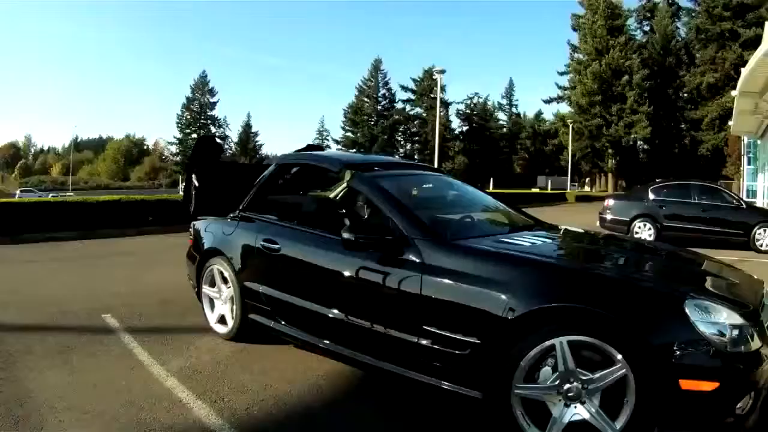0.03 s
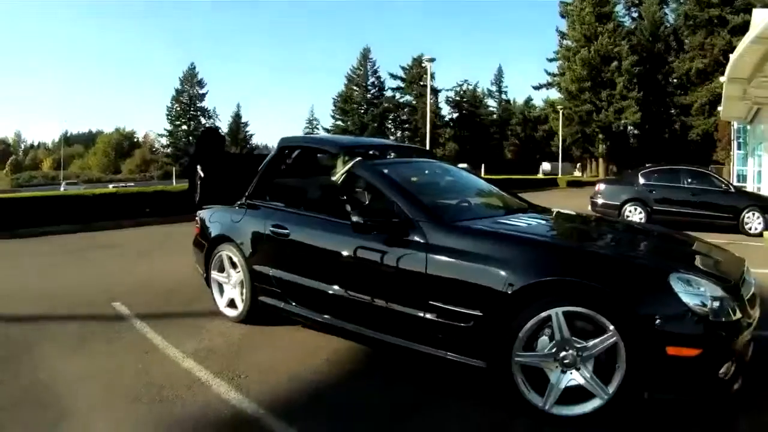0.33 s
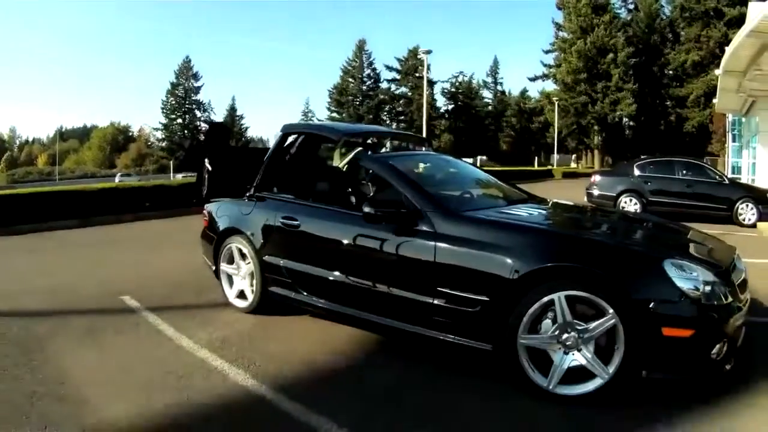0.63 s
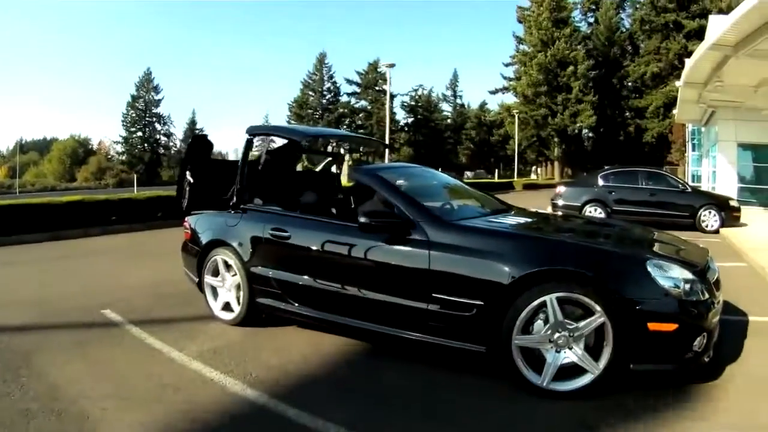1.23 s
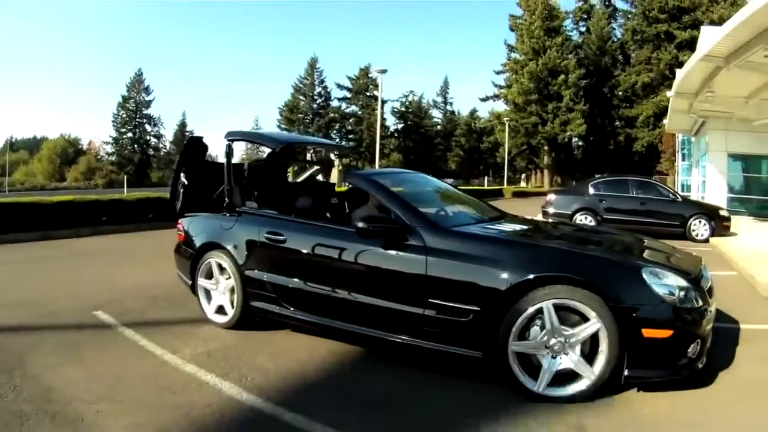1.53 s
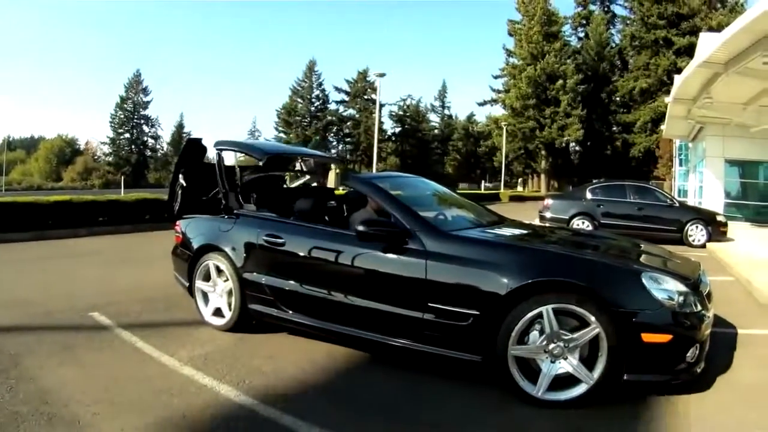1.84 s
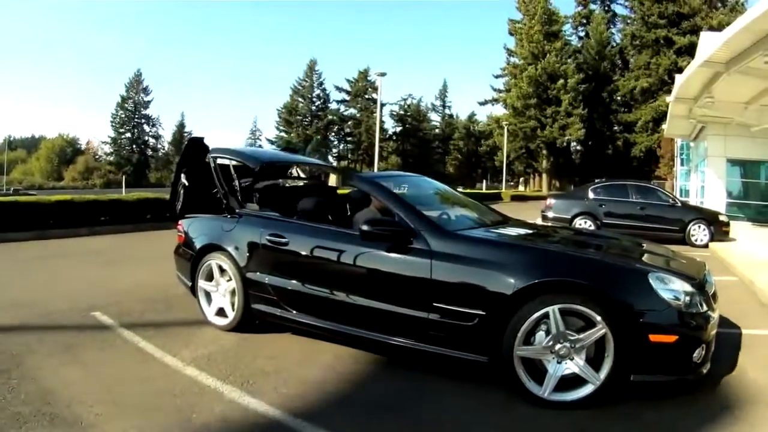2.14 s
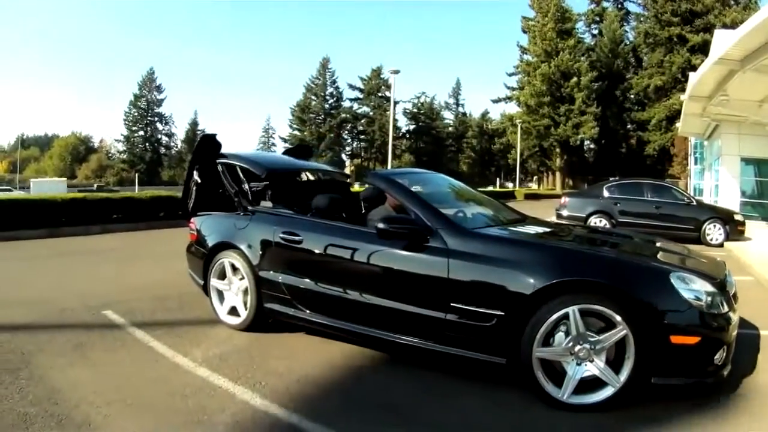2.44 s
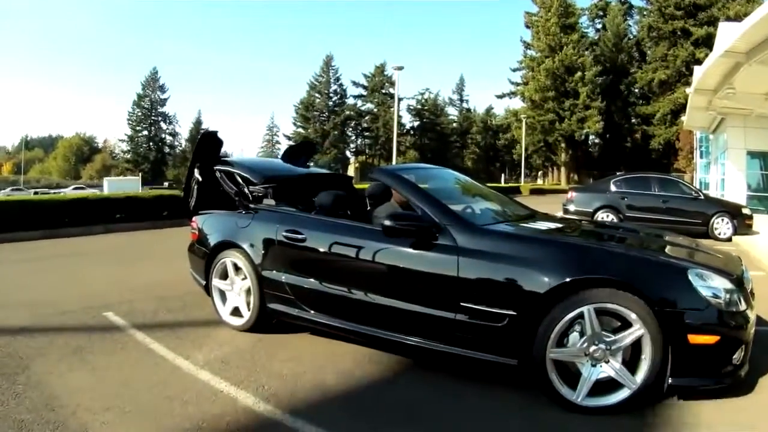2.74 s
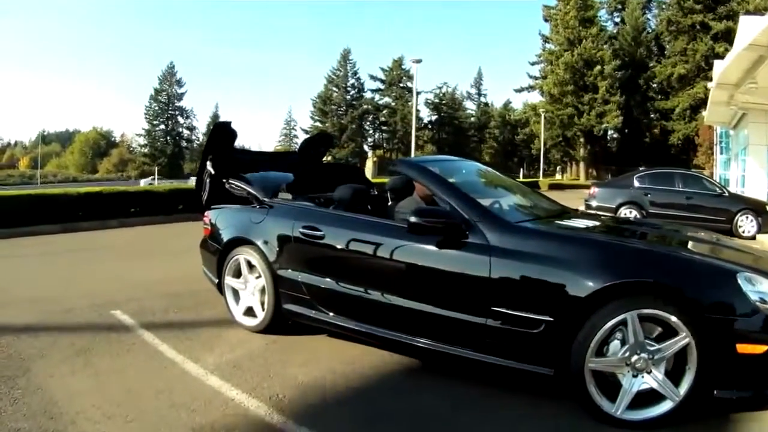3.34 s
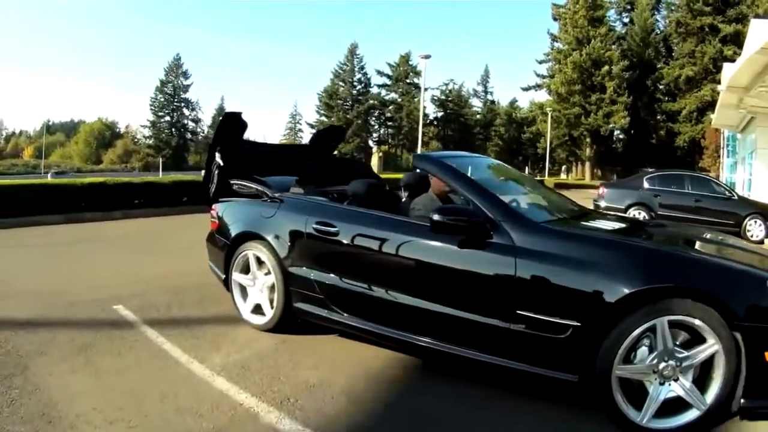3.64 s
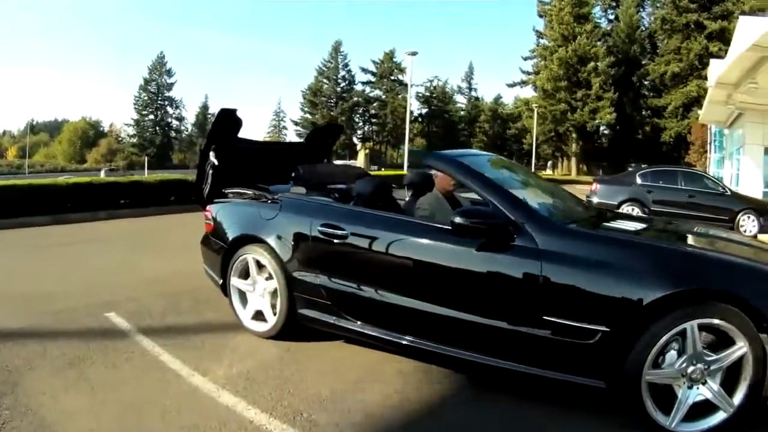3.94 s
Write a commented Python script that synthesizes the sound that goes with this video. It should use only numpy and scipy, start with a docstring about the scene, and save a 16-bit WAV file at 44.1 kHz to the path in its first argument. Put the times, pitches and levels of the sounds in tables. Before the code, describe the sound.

After a brief silence, an idling eight-cylinder car cuts in at about 0.2 seconds, rumbling in an open parking lot. Its speed sags slowly, and the exhaust drone gives way to a lower hum from around 2 seconds. Distant highway tyres roar steadily throughout. Light wind flutters on the microphone, thumping around 1.7 seconds and faintly near 2.9. A slight sizzle follows the sound until the end, near 4 seconds.

```python
"""After a moment of silence, an eight-cylinder car cuts in, idling in an open parking lot.
Its speed sags slowly; the exhaust's drone fades while a lower hum takes over, both multiples of
the crank rate. Tyres roar on a distant highway and light wind thumps on the microphone.
The small camera's low sample rate adds a sizzle that follows the sound."""
import sys
import numpy as np
from scipy import signal
from scipy.fft import rfft, irfft, next_fast_len
from scipy.io import wavfile
from scipy.ndimage import uniform_filter1d, map_coordinates

SR = 44100
rng = np.random.default_rng(int(sys.argv[2]) if len(sys.argv) > 2 else 0)


def file_out(sig):
    """Save sig as 16-bit WAV at sys.argv[1]."""
    # one column per channel
    cols = np.atleast_2d(sig).T
    # limit, then scale
    lim = np.clip(cols, -1, 1)
    pcm = np.round(lim * 32767).astype(np.int16)
    wavfile.write(sys.argv[1], SR, pcm)


N = 176400


def amp(db):
    """Decibels to gain."""
    return 10 ** (np.asarray(db) / 20)


def unit(x):
    """Scale to rms 1."""
    return x / np.sqrt(np.mean(x ** 2) + 1e-20)


def clock():
    """Time of each sample in seconds."""
    return np.arange(N) / SR


def curve(rows):
    """Points joined by straight lines. Each row: time in seconds, value."""
    return np.interp(clock(), *np.transpose(rows))


def wobble(knots_per_s):
    """A smooth random curve around zero."""
    return map_coordinates(rng.standard_normal(4096), [clock() * knots_per_s], mode="wrap")


def filtered(x, response):
    """Filter x by response, a gain as a function of frequency in Hz."""
    size = next_fast_len(N + 8192)
    hz = np.fft.rfftfreq(size, 1 / SR)
    return irfft(rfft(x, size) * response(hz), size)[:N]


def noise(spectrum):
    """Coloured noise of rms 1. Each row: frequency in Hz, relative level in dB."""
    knots_hz, db = np.transpose(spectrum)
    white = rng.standard_normal(N)
    return unit(filtered(white, lambda hz: amp(np.interp(np.log(hz + 1), np.log(knots_hz), db))))


def patchy(x, depth_db):
    """Lay random patches of gain over time and frequency; the result has rms 1."""
    spectra = signal.stft(x, nperseg=1024)[2]
    patches = uniform_filter1d(rng.standard_normal(spectra.shape), size=5, axis=0)
    patches = unit(uniform_filter1d(patches, size=12, axis=1))
    return unit(signal.istft(spectra * amp(depth_db * patches))[1][:N])


def highway():
    """Far from the lot, the tyres of many cars merge into one nearly steady roar."""
    # Each row: time in seconds, level in dB.
    level = [(.23, -27), (.6, -27.5), (1.2, -28), (1.7, -28.5), (2.4, -27.5), (3, -28), (3.4, -29),
             (4, -28.5)]
    # Each row: frequency in Hz, relative level in dB.
    tyre_spectrum = [(60, -21.5), (300, -5.5), (420, -4), (520, -1), (630, -2.5), (780, -.5), (1040, 0),
                     (1230, -4), (1450, -5), (1620, -7), (1770, -7.5), (1950, -10.5), (2400, -13.5),
                     (2850, -15), (3600, -20), (4700, -22.5), (6000, -27.5)]
    return amp(curve(level) + 0.21 * wobble(9)) * patchy(noise(tyre_spectrum), depth_db=0.69)


def wind():
    """A breeze flutters right on the microphone; each strong eddy gives it one short, low shove."""
    # Each row: time in seconds, level in dB.
    breeze_level = [(.23, -29), (1.35, -42), (1.65, -30), (2.15, -31), (2.55, -37), (2.9, -28), (3.2, -36),
                    (3.6, -30.5), (4, -34)]
    # Each row: frequency in Hz, relative level in dB.
    buffet_spectrum = [(8, -36), (20, -14), (42, -2), (65, -5.5), (115, -9), (200, -26), (500, -51)]
    # Each row: centre in seconds, envelope peak in dB, pitch in Hz, half length in seconds.
    thumps = [(1.681, -4, 69.7, 0.008), (1.779, -11.5, 109, 0.0087), (1.839, -10, 72, 0.011),
              (2.876, -18, 38, .028)]
    flutter = amp(2.7 * wobble(14))
    buffeting = amp(curve(breeze_level)) * unit(flutter * noise(buffet_spectrum))
    for centre_s, db, hz, half_s in thumps:
        t = clock() - centre_s
        buffeting += amp(db) * np.exp(-(t / half_s) ** 2) * np.sin(2 * np.pi * hz * t)
    return buffeting


def hum_rush(width_hz=20.3):
    """A narrow band of exhaust noise around the hum, sinking in pitch."""
    # Each row: time in seconds, centre of the band in Hz.
    centre = [(.23, 255.5), (2.2, 237), (3.2, 228), (3.8, 195)]
    # Each row: time in seconds, level in dB.
    level = [(.23, -34), (1.5, -43.5), (2.3, -38.5), (3.3, -42), (3.8, -34)]
    slow_noise = filtered(rng.standard_normal(N), lambda hz: 1 / (1 + (hz / width_hz) ** 2) ** 2)
    carrier = np.sin(2 * np.pi * np.cumsum(curve(centre)) / SR)
    return amp(curve(level)) * unit(slow_noise * carrier)


def crank_tone(turns, order, waver_db, drift_rad):
    """One multiple of the crank rate, unsteady in level and phase, at rms 1."""
    phase = 2 * np.pi * (order * turns + rng.random()) + drift_rad * wobble(7)
    return unit(np.sin(phase) * amp(waver_db * wobble(8)))


def engine():
    """The car idling in the lot: crank tones over an exhaust rumble that puffs at each firing."""
    # Each row: time in seconds, firing rate in Hz.
    firing_rate = [(.25, 78.75), (.7, 78.55), (1.2, 77.56), (2.2, 77.14), (2.7, 76.47), (3.1, 75.47),
                   (3.5, 74.25), (4, 74)]
    # Each row: time in seconds, level in dB.
    boom_level = [(.23, -21.5), (.4, -18.5), (.5, -24), (.6, -19), (.82, -31), (1.25, -29), (1.6, -33.5),
                  (2.1, -25.5), (2.4, -27.5), (2.85, -33.5), (3.02, -21.5), (3.22, -43), (3.4, -19.5),
                  (3.58, -46), (3.78, -31), (4, -43)]  # the firing note
    hum_level = [(.23, -44), (1.9, -41), (2.2, -36.5), (2.75, -33), (3.2, -38.5), (3.45, -36), (4, -42)]  # near 230 Hz
    drone_level = [(.23, -27), (.85, -29), (1.2, -33), (1.6, -38), (2, -34.5), (2.3, -44), (3.2, -42),
                   (4, -59)]  # near 300 Hz
    # Each row: multiple of the crank rate, level in dB (for the drone, relative to drone_level).
    body_orders = [(2, -37.5), (3, -40), (5, -37), (6, -33.5), (7, -40.5), (8, -43), (9, -44.5), (10, -42),
                   (11, -47.5), (13, -43.5)]
    drone_orders = [(8, -8.5), (9, -9.5), (14, -14), (15, -4), (16, -2.5), (18, -15.5), (30, -14.5)]
    # Exhaust noise. Each row: frequency in Hz, relative level in dB.
    rush_spectrum = [(100, -58), (240, -6), (290, 5), (315, -3.5), (335, 7), (355, -8), (390, -49),
                     (700, -60)]
    rumble_spectrum = [(8, -45), (22, -16), (45, -1.5), (80, 2), (122, -1), (170, -2.5), (250, -11.5),
                       (310, -19.5), (420, -28), (900, -62)]

    firings = np.cumsum(curve(firing_rate) * (1 + 0.0039 * wobble(6.04))) / SR
    turns = firings / 4  # eight cylinders fire four times a turn
    boom = amp(curve(boom_level)) * crank_tone(turns, order=4, waver_db=0.7, drift_rad=0.33)
    hum = amp(curve(hum_level)) * crank_tone(turns, order=12, waver_db=2.5, drift_rad=0.38)
    body = sum(amp(db) * crank_tone(turns, order, waver_db=5.5, drift_rad=0.61)
               for order, db in body_orders)
    drone_tones = sum(amp(db) * crank_tone(turns, order, waver_db=3.0, drift_rad=0.47)
                      for order, db in drone_orders)
    drone = amp(curve(drone_level)) * (drone_tones + amp(-4.5) * noise(rush_spectrum))
    puffs = 1 + 0.33 * np.cos(2 * np.pi * firings)
    rumble = amp(-28) * unit(puffs * noise(rumble_spectrum))
    return boom + hum + body + drone + rumble


def scene():
    """The car, the distant highway and the wind, all at one microphone in the open lot."""
    return (engine() + hum_rush() + highway() + wind())[None]


def record(dry):
    """The camera cuts in, dulls the treble and holds each slow sample, mirroring the sound as sizzle."""
    start_s, hold_hz = 0.229, 12000
    roll_off_hz, steepness = 5657, 23.3
    top_hz, edge_hz = 15380, 200
    dulled = filtered(dry[0], lambda hz: 1 / (1 + (hz / roll_off_hz) ** steepness))
    mirrored = dulled * (1 + 2 * np.cos(2 * np.pi * hold_hz * clock()))  # images either side of hold_hz
    held = filtered(mirrored, lambda hz: np.sinc(hz / hold_hz))
    gated = held * (clock() > start_s)
    # The sizzle stops at top_hz, behind a short, smooth edge.
    return filtered(gated, lambda hz: np.sin(np.pi / 2 * np.clip((top_hz - hz) / edge_hz, 0, 1)) ** 2)[None]


dry = scene()
out = record(dry)
file_out(out)
```